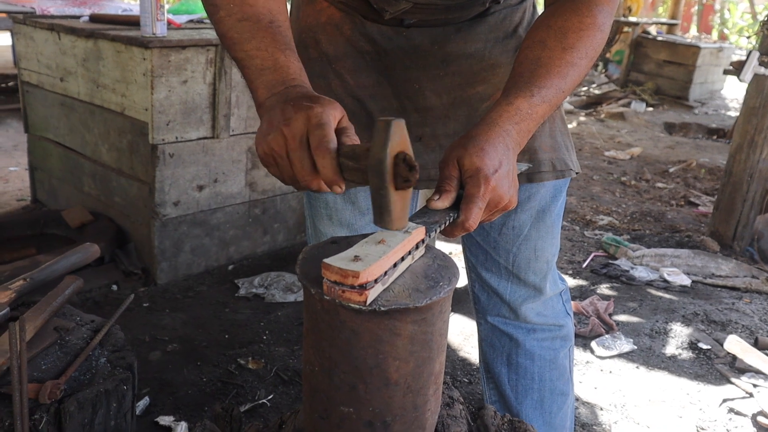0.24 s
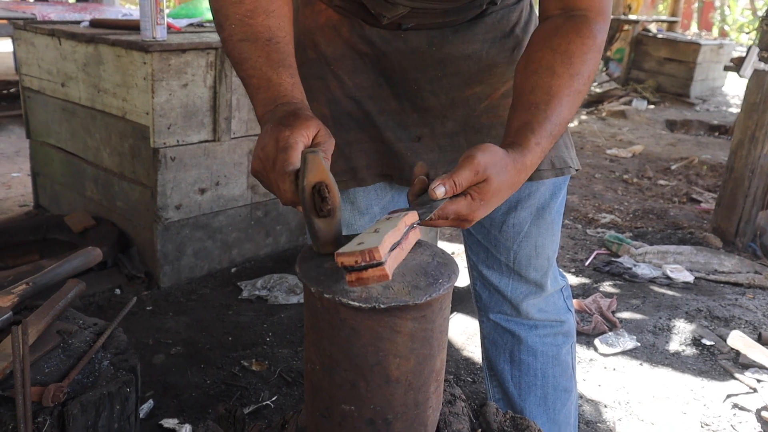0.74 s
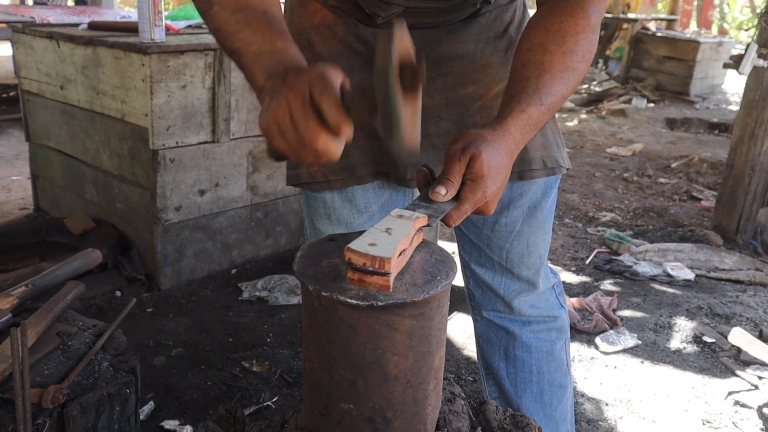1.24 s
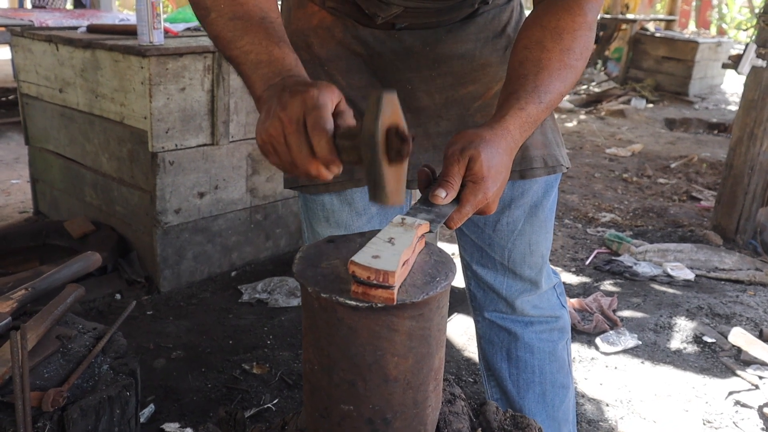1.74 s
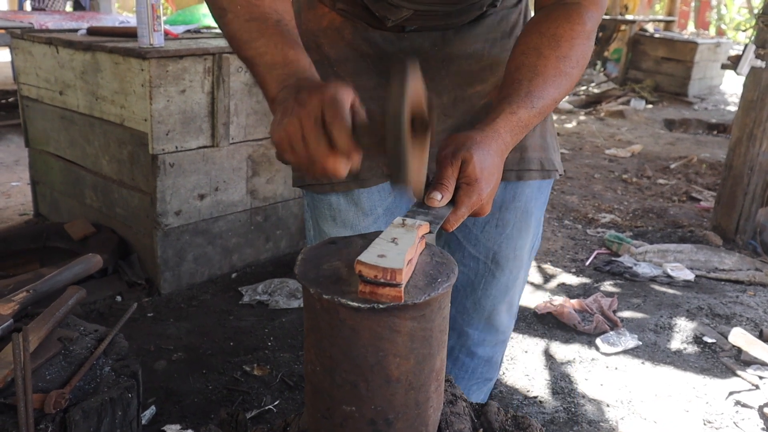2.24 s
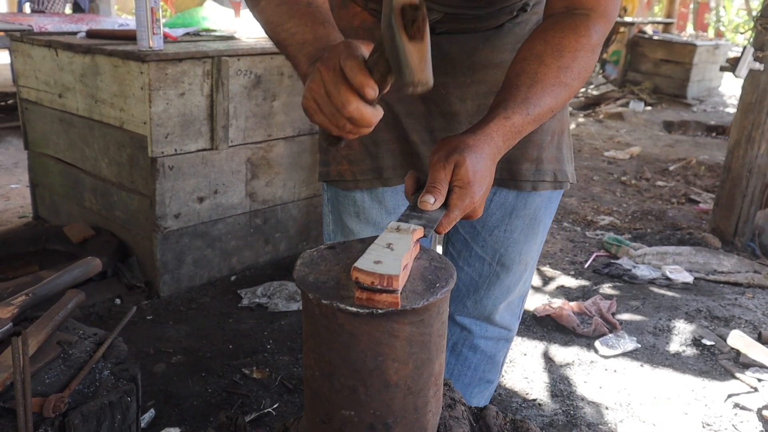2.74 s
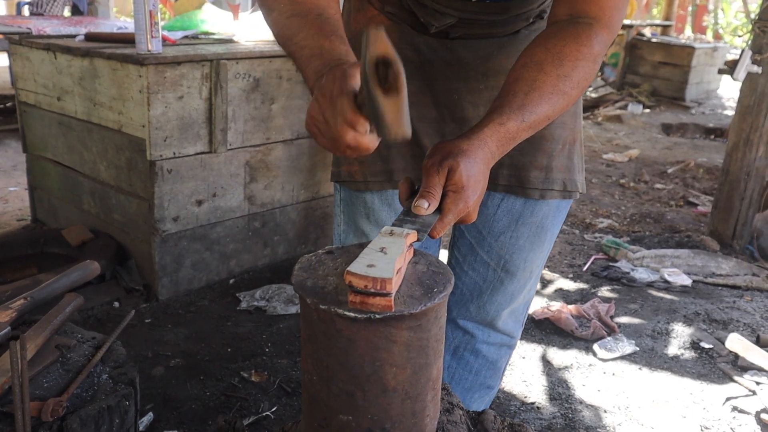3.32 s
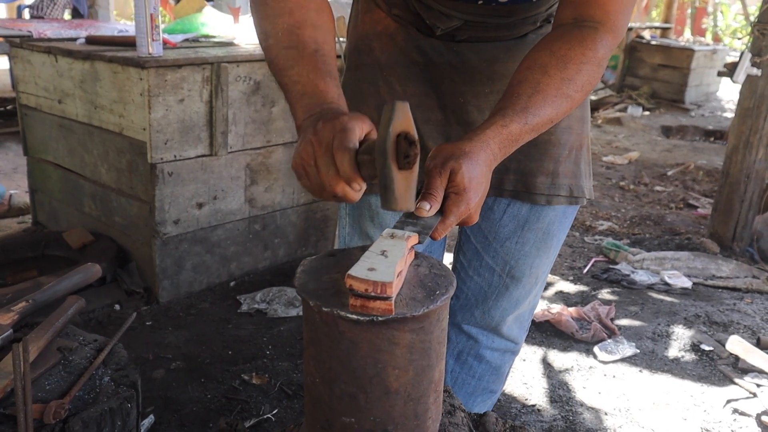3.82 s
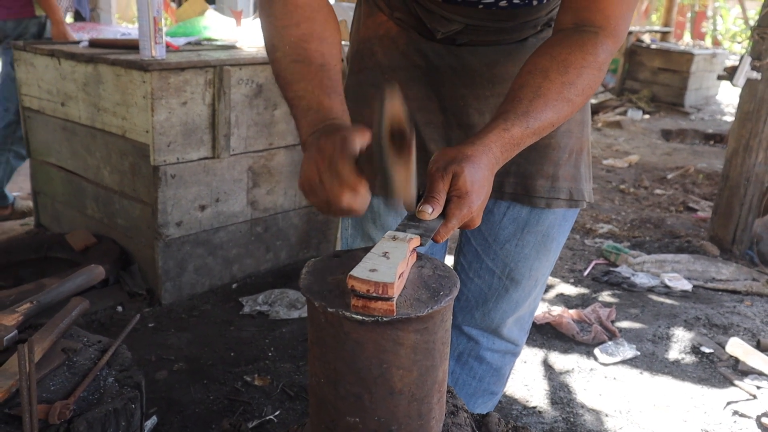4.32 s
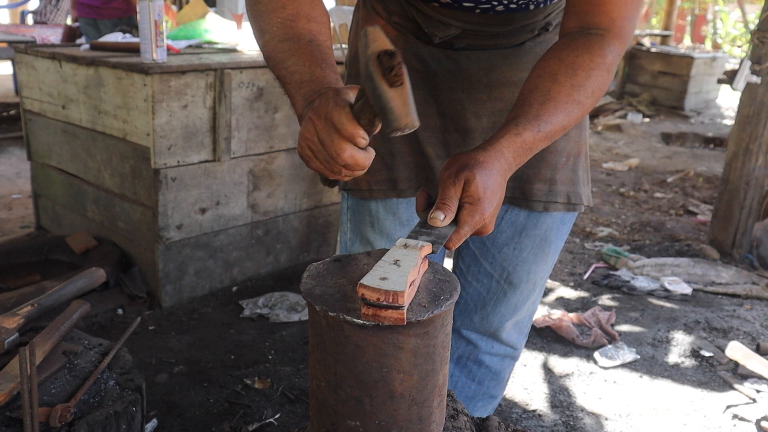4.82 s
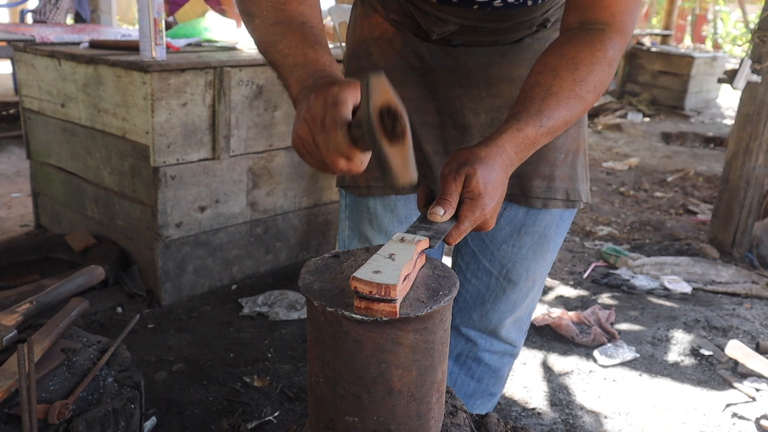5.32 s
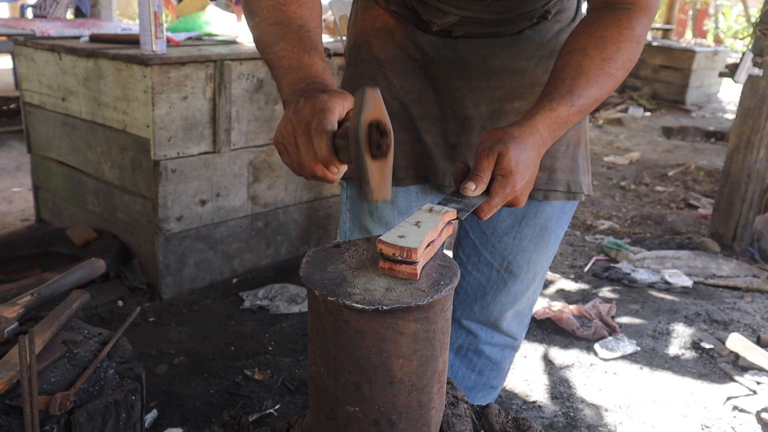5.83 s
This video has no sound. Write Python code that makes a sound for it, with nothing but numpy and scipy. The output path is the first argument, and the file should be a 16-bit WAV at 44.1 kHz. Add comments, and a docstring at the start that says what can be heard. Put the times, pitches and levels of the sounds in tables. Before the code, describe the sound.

A hammer peens pins in a knife's wooden handle on a steel block. Dry, very loud metallic cracks come first, then a quick clattering bounce, a pause with light scrapes, and a regular run of blows to the end. Short echoes return from ground, roof and plank wall. Distant machinery or traffic rumbles softly beneath, with thin air hiss, heard close in stereo.

```python
"""Under an open shed roof, a hammer peens the pins of a wooden knife handle on a steel block.
Each blow cracks as noise, then rings decaying sines for clank, knock and thud, and noise bands for blade buzz.
Once the knife is dropped and bounces; small knocks are short tones, scuffs on the block are grainy noise.
Ground, roof and a plank wall echo the impacts, the yard adds rumble and hiss, and blows overload the input."""
import sys
import numpy as np
from scipy import signal
from scipy.fft import rfft, irfft, next_fast_len
from scipy.io import wavfile

SR = 44100
rng = np.random.default_rng(int(sys.argv[2]) if len(sys.argv) > 2 else 0)


def master_out(mix):
    """Clip the mix to full scale and print it as 16-bit PCM to the path in sys.argv[1]."""
    frames = np.transpose(np.atleast_2d(mix))
    ceiling = np.clip(frames, -1, 1)
    pcm = np.round(ceiling * 32767).astype(np.int16)
    wavfile.write(sys.argv[1], SR, pcm)


N = 267246
RUN_IN = SR // 10  # samples before time 0, so that the first blow is already ringing


def from_db(db):
    """Turn dB into a gain."""
    return 10 ** (np.asarray(db) / 20)


def rms_one(x):
    """Scale to an rms of 1."""
    return x / np.sqrt(np.mean(x ** 2) + 1e-20)


def at_hz(points, hz, index=1):
    """Read one column of a frequency table, interpolating along log frequency."""
    points = np.array(points)
    return np.interp(np.log(hz), np.log(points[:, 0]), points[:, index])


def drift(rate_hz):
    """Slow random wander of rms 1: noise through two equal low-pass poles, run at SR / 40."""
    pole = np.exp(-80 * np.pi * rate_hz / SR)
    noise = rng.standard_normal(N // 40 + 2002)
    slow = signal.lfilter([1], [1, -2 * pole, pole * pole], noise)[2000:]  # skip the filter's start
    return np.interp(np.arange(N) / 40, np.arange(len(slow)), rms_one(slow))


def ring(force, hz, t60_s):
    """Two-pole resonator: a unit click sets off a sine of height 1 that dies by 60 dB in t60_s."""
    decay = from_db(-60 / (t60_s * SR))
    angle = 2 * np.pi * hz / SR
    return signal.lfilter([0, np.sin(angle)], [1, -2 * decay * np.cos(angle), decay * decay], force + 1e-18)


def bands(source, shape):
    """Stereo noise in half-octave bands from mid and side; shape(hz) gives gain and left-right likeness."""
    out = 0
    edges_hz = 22 * 2 ** np.arange(0, 10, .5)
    for k, (low, high) in enumerate(zip(edges_hz, edges_hz[1:])):
        band_pass = signal.butter(2, [low, high], "band", fs=SR, output="sos")
        mid, side = signal.sosfilt(band_pass, source[k % 2])  # neighbouring bands use separate noise
        gain, alike = shape(np.sqrt(low * high))
        alike = np.clip(alike, 0, 1)
        out = out + gain * (np.sqrt(1 + alike) * mid + np.sqrt(1 - alike) * side * [[1], [-1]])
    return out


def colour(x, spectrum):
    """Impose a smooth spectrum."""
    size = x.shape[-1]
    gain = from_db(at_hz(spectrum, np.fft.rfftfreq(size, 1 / SR) + 1))
    return irfft(rfft(x) * gain, size)


# hammer blows: start_s, ring_db (drives clank and blade buzz), firm_seat_db (handle firmer on the block),
# crack_db, place (0 inner pin - 1 outer pin), flat_db (favours low clank over high),
# free_db (blade buzz freer near 3.4 kHz)
BLOWS = [(-0.04, -3, 4.5, 4.5, 0.48, 0.8, 2), (0.2196, -1.6, 1, 1, 0.52, 1.5, 2.5),
         (1.3313, 3, -11, 7, 1, 2.5, 1), (1.6343, 0.9, -0.1, -7, 1, 0.3, .1),
         (2.3091, -4.5, 1, 4.5, 0.26, 2.5, -5.5), (2.621, -0.1, 2, 2.5, 0.19, 1, 0.5),
         (2.9193, 1.3, 1.5, 2.5, 0.24, 0.3, 0.5), (3.2252, -0.6, 2.4, 1.5, 0.037, -2.5, -0.5),
         (3.5197, -1.1, -0.6, 2.5, 0.084, 3, 0.5), (3.8196, -0.9, 1.2, 2, 0.068, 1, 2),
         (4.1122, -1.6, -0.3, 3.5, 0.061, -0.8, 1), (4.396, -0.8, -0.1, 3.5, 0.19, 0.3, 1.2),
         (4.6795, -0.7, -0.1, 3.5, 0.24, 2, -0.5), (4.9796, 2, -1.3, -4.5, 0.42, 2, -3),
         (5.2646, -0.3, 1, -2.5, 0.081, -5, -5.5), (5.5413, 1.15, -2, 4, 0.18, -0.8, -4)]
# landing and bounces of the dropped knife: start_s, ring_db (drives clank and blade buzz), crack_db
BOUNCES = [(0.5434, -1, -12), (0.6076, -3.5, -36), (0.6509, -6, -49), (0.6811, -13.5, -60)]
# crack of steel face on pin: pitch_hz, density_db (per Hz)
CRACK_COLOUR = [(2000, -2.5), (5000, -0.5), (7000, 2.5), (9000, -5), (11500, -3), (16000, -10.5)]
# clank of knife on block: pitch_hz, t60_s, inner_pin_db, outer_pin_db, dropped_db
CLANK = [(880, 0.0064, -7, -11.5, -75), (1065.5, 0.047, -17.5, -9.5, -42), (1405, 0.0087, -6, -21.5, -38),
         (1506, 0.031, -3.5, -10, -5.5), (1737, 0.019, -3.5, -20.5, -1.5), (2048, 0.0096, 2.5, 3, -6.5),
         (2450, 0.019, -8, 1, -15.5), (2818, 0.019, -8, 1.5, -3.5), (3170, 0.018, -3, -4.5, -1),
         (3530, 0.019, -4.5, -10.5, -2.5), (4004, 0.013, -2.5, -6, 2.5), (4436, 0.018, -8.5, -8, -50),
         (4790, 0.018, -11, -4, -6.5), (5470, 0.0098, -3, -10, -2), (6170, 0.0076, -5.5, -0.5, -9),
         (7280, 0.0078, -1, -1.5, -34)]
# knock of the wooden scales: pitch_hz, t60_s, level_db
WOOD_KNOCK = [(407, 0.029, -3), (505, 0.016, 6.5), (604, 0.011, -3.5), (773.5, 0.035, -2)]
# buzz of the loose blade after the impact: pitch_hz, width_hz, t60_s, inner_pin_db, outer_pin_db, dropped_db
BLADE_BUZZ = [(369.1, 11, 0.26, -39.5, -48, -43.5), (1042, 70, 0.19, -34, -43, -52.5),
              (1283, 140, 0.26, -29.5, -56, -44), (1590, 85, 0.22, -45.5, -40.5, -37),
              (2600, 470, 0.12, -42, -30, -34), (3346, 300, 0.25, -31.5, -40, -35),
              (4200, 500, 0.05, -50, -39.5, -30), (5040, 400, 0.11, -56, -36, -44.5)]
# thud of the block on the ground: pitch_hz, t60_s, level_db
BLOCK_THUD = [(122, 0.08, 3), (180, 0.077, 3)]
CLANK_DB, BUZZ_DB = -5.5, 7.5  # added to the clank and buzz tables
THUD_DB, KNOCK_DB, KNOCK_FOLLOWS = -27.5, -17, 1.5  # under a blow; knock dB per dB of firmer seat
DROP_THUD_DB, DROP_KNOCK_DB = -38, -28.5  # under a bounce


def knife():
    """Each impact cracks, then runs through knife and block: highs speak first, lows a few ms later."""
    impacts = list(BLOWS) + [(s, db, 0, crack_db, -1, 0, 0) for s, db, crack_db in BOUNCES]
    start_s, ring_db, seat_db, crack_db, place, flat_db, free_db = np.transpose(impacts)
    dropped = place < 0
    thud_db = np.where(dropped, DROP_THUD_DB, THUD_DB + seat_db)
    knock_db = np.where(dropped, DROP_KNOCK_DB, KNOCK_DB + KNOCK_FOLLOWS * seat_db)
    at = np.round(start_s * SR).astype(int) + RUN_IN

    def by_place(inner_db, outer_db, drop_db):
        """Level of a clank or buzz mode for the spot that is struck."""
        pinned_db = inner_db + np.clip(place, 0, 1) * (outer_db - inner_db)
        return ring_db + np.where(dropped, drop_db, pinned_db)

    def tilt(hz):
        """A flat blow feeds the modes near 2 kHz, a glancing one those near 4 kHz."""
        return flat_db * np.interp(hz, [1100, 1600, 2080, 3200, 4500, 6000], [0, 1, 1, -1, -1, 0])

    def clank_and_knock():
        """Steel and wood modes ring from clicks of random sign, a little apart at the two ports."""
        modes = [(hz, t60_s, by_place(*db) + CLANK_DB + tilt(hz)) for hz, t60_s, *db in CLANK]
        modes += [(hz, t60_s, db + knock_db) for hz, t60_s, db in WOOD_KNOCK]
        out = np.zeros((2, N + RUN_IN))
        for hz, t60_s, db in modes:
            chance = rng.random((len(at), 4))
            late_s = np.minimum(1.6 / hz, .004) * (.4 + chance[:, 0])
            # a mode radiates unevenly towards the ports
            apart_s = np.minimum(0.15 / hz, .00012) * (chance[:, 3] - .5)
            click = np.sign(chance[:, 1] - .5) * from_db(db - chance[:, 2])  # up to 1 dB weaker
            force = np.zeros((2, N + RUN_IN))
            for port, sign in enumerate((1, -1)):
                force[port, at + np.round((late_s + sign * apart_s) * SR).astype(int)] = click
            out += ring(force, hz, t60_s)
        return out

    def crack():
        """Face on pin: a noise burst with a fast and a slower decay, partly shared by the ports."""
        t = np.arange(512) / SR
        fall = np.exp(-t / 0.0011) + 0.24 * np.exp(-t / 0.0041)
        rise = 1 - np.exp(-t / 0.00039)
        noise = rng.standard_normal((3, len(at), 512))
        bursts = np.zeros((3, N + RUN_IN))
        bursts[:, at[:, None] + np.arange(512)] = noise * fall * rise * from_db(crack_db)[:, None]
        return colour(bursts[0] + 0.62 * bursts[1:], CRACK_COLOUR)

    def buzz():
        """The loose blade buzzes on: narrow noise bands start 4 ms after impact and die away."""
        out = 0
        for hz, width_hz, t60_s, *db in BLADE_BUZZ:
            freer_db = free_db * (3000 < hz < 3800)
            kicks = np.zeros(N + RUN_IN)
            kicks[at + round(.004 * SR)] = from_db(by_place(*db) + BUZZ_DB + 0.45 * tilt(hz) + freer_db)
            dying = signal.lfilter([1], [1, -from_db(-60 / (t60_s * SR))], kicks + 1e-18)
            noise = rng.standard_normal(N + RUN_IN)
            out = out + dying * rms_one(ring(noise, hz, np.log(1000) / (np.pi * width_hz)))
        return out

    def thud():
        """The block on the ground: two low modes, pushed 7 ms after impact."""
        push = np.zeros(N + RUN_IN)
        push[at + round(.007 * SR)] = from_db(thud_db)
        return sum(from_db(db) * ring(push, hz, t60_s) for hz, t60_s, db in BLOCK_THUD)

    body = clank_and_knock() + crack() + buzz()
    no_bass = signal.butter(3, 340, "high", fs=SR, output="sos")  # so small a body sends out no bass
    return signal.sosfilt(no_bass, body) + thud()


# small knocks and ticks: start_s, level_db, pitch_hz
TICKS = [(0.317, -29.5, 1630), (0.796, -38, 1120), (1.23, -45, 1150), (3.717, -33, 1616),
         (3.779, -29.5, 1650), (3.788, -34, 1773), (5.907, -42, 1100)]
# one dull bump between blows: start_s, level_db, pitch_hz
SOFT_KNOCK = (.1552, -24.5, 300)


def ticks():
    """Light touches: a few cycles at one pitch with a faint click on top, and one dull bump."""
    out = np.zeros(N + RUN_IN)
    t = np.arange(2048) / SR
    for start_s, db, hz in TICKS:
        at = round(start_s * SR) + RUN_IN
        tone = np.sin(2 * np.pi * hz * t) * from_db(-60 * t * hz / 21.0)  # down 60 dB in 21 cycles
        click = .15 * rng.standard_normal(len(t)) * np.exp(-t / .001)
        out[at:at + len(t)] += from_db(db) * (tone + click)
    start_s, db, hz = SOFT_KNOCK
    at = round(start_s * SR) + RUN_IN
    envelope = np.exp(-t / 0.0046) * (1 - np.exp(-t / 0.00021))
    out[at:at + len(t)] += from_db(db) * np.cos(2 * np.pi * hz * t) * envelope
    return out


# dust grinding under the sliding knife: start_s, length_s, swell_share (of the length),
# rubbing_db, scratching_db, grit_db
SCUFFS = [(0.145, 0.1, 0.13, -47, -51, -74.5), (0.394, 0.055, 0.34, -76, -63, -51),
          (0.521, 0.024, .4, -46, -45.5, -56), (0.743, 0.11, 0.37, -47, -49.5, -56),
          (0.897, 0.089, .55, -54, -54, -59), (1.226, 0.027, 0.28, -61, -55, -58),
          (1.484, 0.11, 0.55, -51, -54.5, -59.5), (1.596, 0.022, 0.27, -52, -50, -58),
          (1.888, 0.075, 0.54, -54.5, -58, -62), (1.955, 0.13, 0.23, -52.5, -50.5, -57),
          (2.229, 0.099, 0.5, -45, -46.5, -56.5), (2.473, .15, 0.43, -46.5, -51.5, -58.5),
          (2.77, 0.085, 0.18, -54, -61, -59.5), (3.099, 0.074, .25, -43.5, -56, -57),
          (3.15, 0.084, .7, -45.5, -52, -57.5), (3.392, 0.1, 0.47, -53.5, -66, -61),
          (3.706, 0.2, 0.16, -45.5, -50, -48), (3.968, .1, 0.53, -59, -63, -64),
          (4.329, 0.055, 0.21, -43, -57, -64), (4.526, 0.12, 0.47, -54, -56, -69),
          (4.64, 0.051, 0.4, -54, -66, -81), (4.858, 0.14, 0.6, -57.5, -84, -81.5),
          (5.113, .05, .3, -50, -61, -59), (5.181, 0.075, 0.56, -45.5, -52, -61),
          (5.473, 0.053, 0.43, -57, -60, -82), (5.681, .2, .6, -54.5, -50, -48),
          (5.886, 0.13, 0.43, -56.5, -84, -80)]
# dull rub: pitch_hz, density_db (per Hz)
RUBBING = [(500, -17.5), (850, -8), (1250, -4.5), (1650, -6.5), (1900, -6.5), (2200, -23), (4000, -54)]
# mid scratch: pitch_hz, density_db (per Hz)
SCRATCHING = [(1500, -32.5), (2300, 3.5), (3200, 0), (4800, -1.5), (6500, -24.5)]
# bright grit: pitch_hz, density_db (per Hz)
GRIT = [(3500, -30), (5500, 3), (7500, 0.5), (11000, -5.5), (16000, -5)]
SCUFF_ENDS_DB, SCUFF_CUT_DB_PER_S = -11.5, 897.5  # ends of a stroke against its peak; extra fade outside it


def scuffs():
    """Dust under the sliding wood: dense uneven grains rub, scratch and grit; each stroke swells and sinks."""
    t = np.arange(N) / SR
    unevenness_db = 2.1 * drift(60) + 0.61 * rng.exponential(1, N)
    grains = rng.standard_normal((3, 3, N)) * from_db(unevenness_db)
    levels = np.zeros((3, N))
    for start_s, length_s, swell_share, *db in SCUFFS:
        swell_s = swell_share * length_s
        before_peak = (start_s - t) / swell_s + 1
        after_peak = (t - start_s - swell_s) / (length_s - swell_s)
        away = np.maximum(before_peak, after_peak)  # 0 at the peak, 1 at both ends
        outside_s = np.maximum(0, np.maximum(start_s - t, t - start_s - length_s))
        stroke_db = SCUFF_ENDS_DB * away ** 2 - SCUFF_CUT_DB_PER_S * outside_s
        levels += from_db(db)[:, None] * from_db(stroke_db)
    out = 0
    for level, dust, spectrum in zip(levels, grains, (RUBBING, SCRATCHING, GRIT)):
        out = out + level * rms_one(colour(dust[0] + 1.6 * dust[1:], spectrum))
    return out


# echoes off ground, bench and roof: delay_s, level_db
ECHOES = [(.0042, -11.5), (0.01, -12), (.016, -15), (0.028, -17)]
# lows returned by the plank wall behind: delay_s, level_db, cutoff_hz
WALL = (0.036, -14.5, 450)
# scattered sound under the roof: pitch_hz, level_db, t60_s
SCATTER = [(100, -36.5, 0.16), (302, -38, 0.29), (680, -45.5, 0.33), (1200, -47.5, 0.4),
           (2490, -42.5, 0.26), (4800, -41, 0.27), (7970, -43.5, 0.22), (13000, -41.5, 0.2)]
# how alike the scatter is at the two ports: pitch_hz, likeness (0-1)
SCATTER_LIKENESS = [(100, .995), (350, .97), (700, .7), (1200, .45), (2500, .1), (13000, .03)]
# level balance of the direct sound: pitch_hz, left_over_right_db
LEAN = [(100, -0.4), (400, -1.5), (700, 4), (1150, 6.5), (1800, 2), (2600, -6), (3600, 10), (5000, 4),
        (7500, -2), (12000, 0.5)]
# phase balance of the direct sound: pitch_hz, left_lead_rad
LEAD = [(100, 0), (700, .15), (1800, -.3), (3600, .5), (5000, .2), (7500, .4), (12000, 1.1)]


def shed(x):
    """Direct sound differs in level and phase at the ports; echoes ride on scatter that dies band by band."""
    t = np.arange(SR // 2) / SR
    rise = 1 - np.exp(-(t / 0.01) ** 2)

    def scatter(hz):
        """Decay and likeness of one band."""
        decay_db = at_hz(SCATTER, hz) - 60 * t / at_hz(SCATTER, hz, index=2)
        return rise * from_db(decay_db), at_hz(SCATTER_LIKENESS, hz)

    response = bands(rng.standard_normal((2, 2, len(t))), scatter)
    smear = np.exp(-t[:64] / .0002)  # uneven ground and roof spread each echo
    for delay_s, echo_db in ECHOES:
        at = round(delay_s * SR)
        spread = rng.random((2, 64)) ** 4 * smear
        response[:, at:at + 64] += from_db(echo_db) * spread / spread.sum(axis=1, keepdims=True)
    delay_s, wall_db, wall_hz = WALL
    at = round(delay_s * SR)
    dull = np.exp(-2 * np.pi * wall_hz * t[:256])  # one-pole low-pass
    response[:, at:at + 256] += from_db(wall_db) * dull / dull.sum()

    size = next_fast_len(N + RUN_IN)
    hz = np.fft.rfftfreq(size, 1 / SR) + 1
    side = np.array([[.5], [-.5]])  # half of each difference to each port
    balance = from_db(side * at_hz(LEAN, hz)) * np.exp(1j * side * at_hz(LEAD, hz))
    direct = irfft(rfft(x, size) * balance, size)
    reflected = signal.fftconvolve(x, response, axes=1)[:, :size]
    return (direct + reflected)[:, RUN_IN:RUN_IN + N]


# rumble level over time: time_s, level_db
RUMBLE = [(0.0, -40.5), (0.129, -49.5), (1.0, -49.5), (1.551, -50), (2.9, -48.5), (4.0, -50), (5.2, -48),
          (6.06, -49)]
# rumble spectrum: pitch_hz, density_db (per Hz)
RUMBLE_COLOUR = [(12, -53), (20, -28.5), (75, -1.5), (125, -2), (184, -4), (358, -11.5), (435, -11),
                 (552, -22.5), (700, -22), (910, -55), (1540, -120)]
# air hiss spectrum: pitch_hz, density_db (per Hz)
AIR_COLOUR = [(240, -31.5), (400, -2.5), (638, -3), (1130, -4.5), (3120, -10), (13100, -23), (15700, -20),
              (16500, -45)]
# how alike the yard is at the two ports: pitch_hz, likeness (0-1)
YARD_LIKENESS = [(60, 0.99), (180, 1), (550, 0.77), (1650, 0.06), (4970, 0.11), (15000, 0.02)]
AIR_DB = -56  # rms of the hiss


def yard():
    """Far machinery and traffic as a lumpy rumble of drifting noise bands, over a smooth hiss of air."""
    def rumble_band(hz):
        """Drifting level and likeness of one band, silent from 1 kHz up."""
        gain = from_db(at_hz(RUMBLE_COLOUR, hz) + 1.9 * drift(3.7)) * (hz < 1000)
        return gain, at_hz(YARD_LIKENESS, hz)

    def air_band(hz):
        """Steady level and likeness of one band."""
        return from_db(at_hz(AIR_COLOUR, hz)), at_hz(YARD_LIKENESS, hz)

    level = from_db(np.interp(np.arange(N) / SR, *np.transpose(RUMBLE)))
    rumble = bands(rng.standard_normal((2, 2, N)), rumble_band)
    air = bands(rng.standard_normal((2, 2, N)), air_band)
    return level * rms_one(rumble) + from_db(AIR_DB) * rms_one(air)


def scene():
    """Impacts in the shed, scuffs and yard."""
    return shed(knife() + ticks()) + scuffs() + yard()


def record(dry):
    """Blows press softly against the input's ceiling; loud parts lose deep bass and the top is cut."""
    ceiling, cutoff_hz = .9, 16900
    clipped = dry / (1 + np.abs(dry / ceiling) ** 4) ** .25
    quiet = np.clip(dry, -.02, .02)  # this part keeps its bass
    no_bass = signal.butter(2, 120, "high", fs=SR, output="sos")
    loud = signal.sosfilt(no_bass, clipped - quiet)  # overload sheds its bass
    full = np.clip(loud + quiet, -.97, .97)
    no_top = signal.cheby2(12, 70, cutoff_hz, fs=SR, output="sos")
    return np.clip(signal.sosfilt(no_top, full), -1, 1)


dry = scene()
out = record(dry)
master_out(out)
```